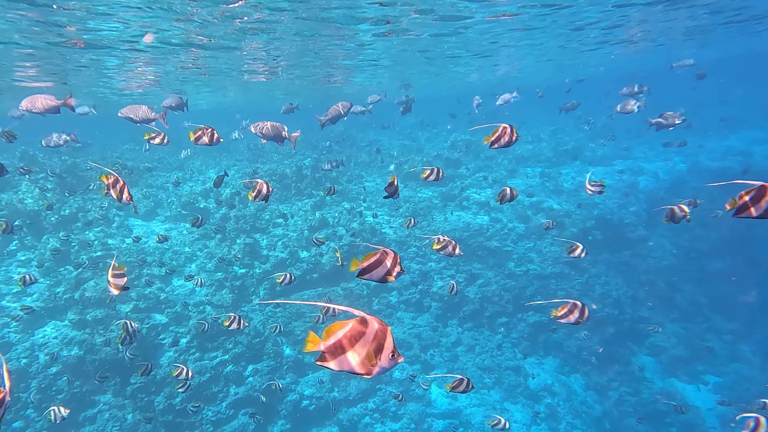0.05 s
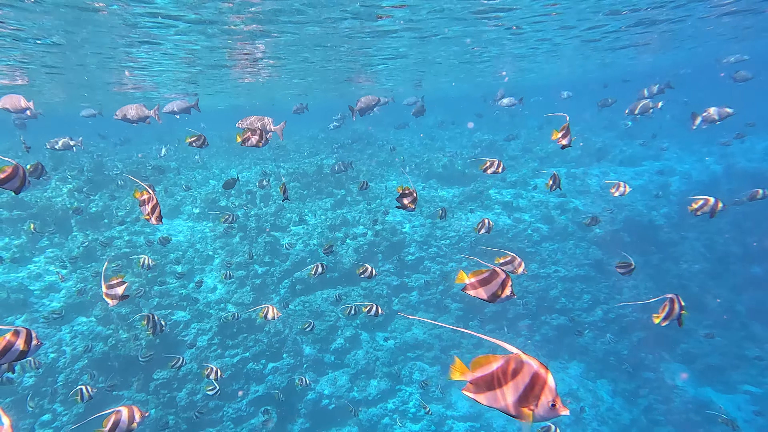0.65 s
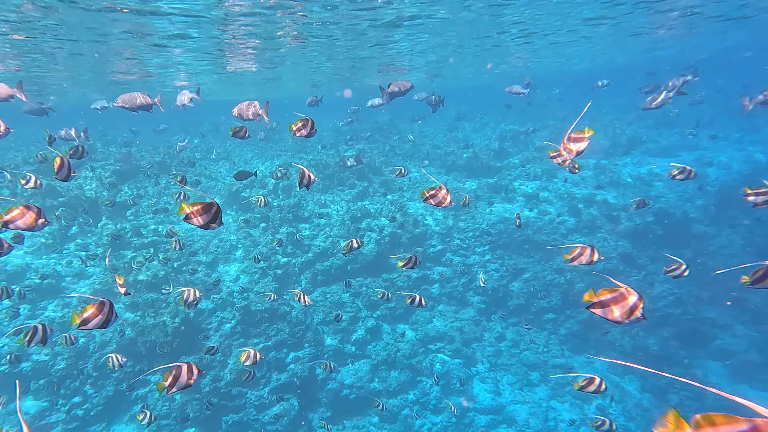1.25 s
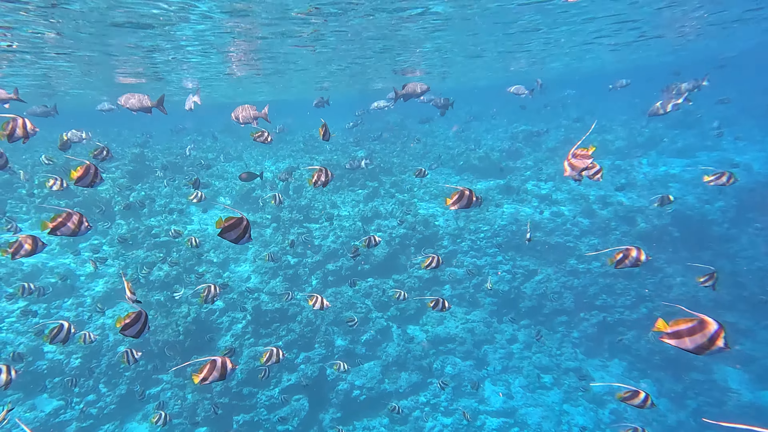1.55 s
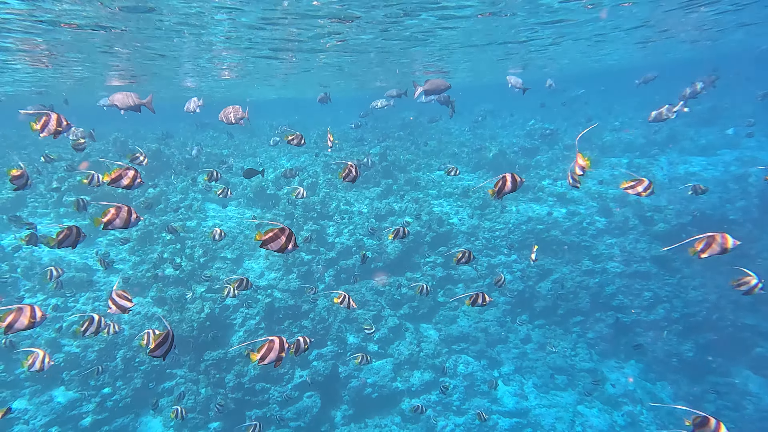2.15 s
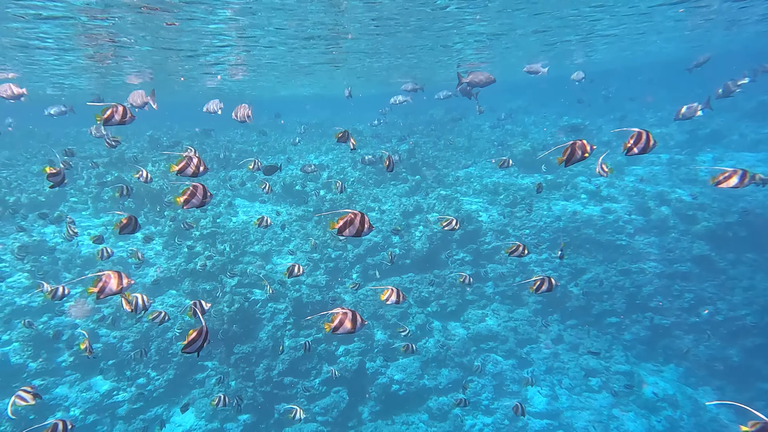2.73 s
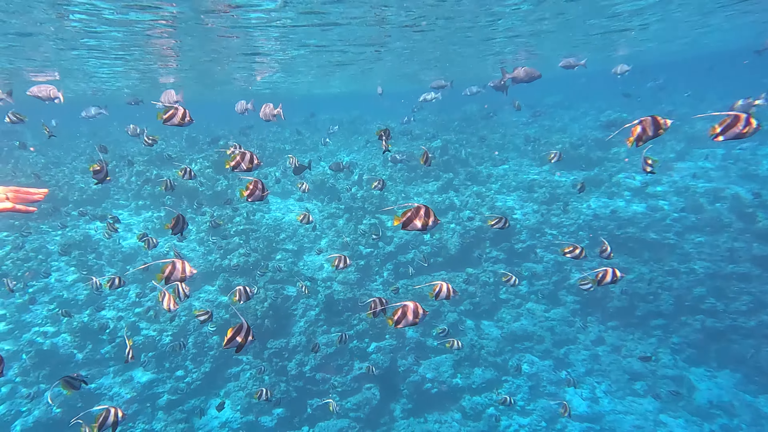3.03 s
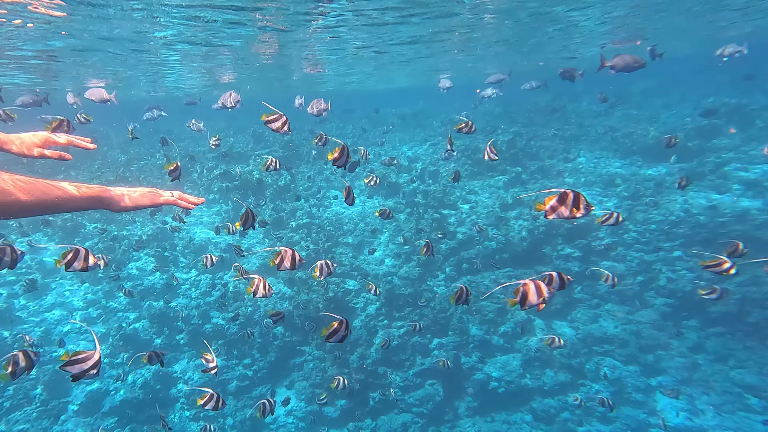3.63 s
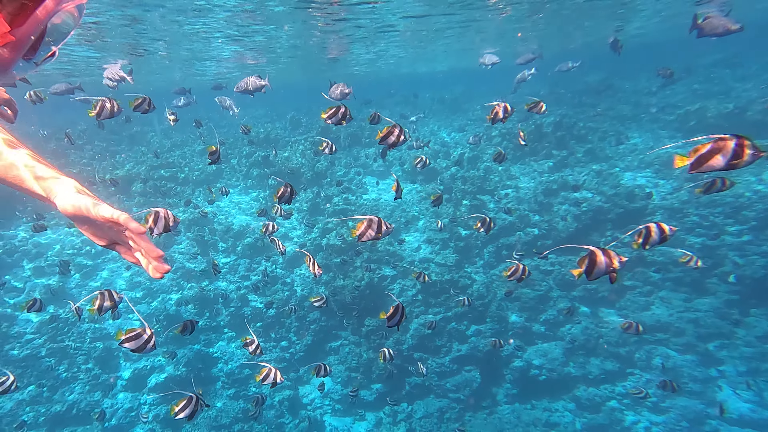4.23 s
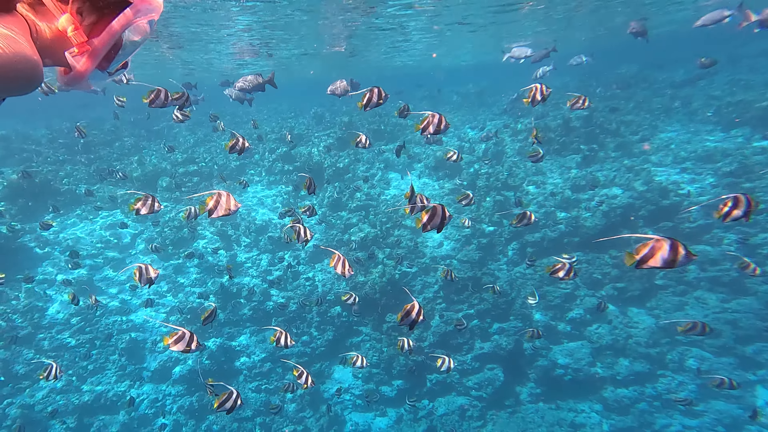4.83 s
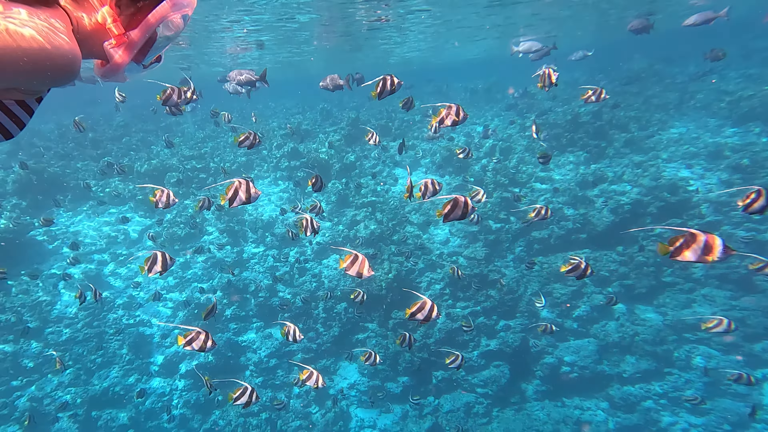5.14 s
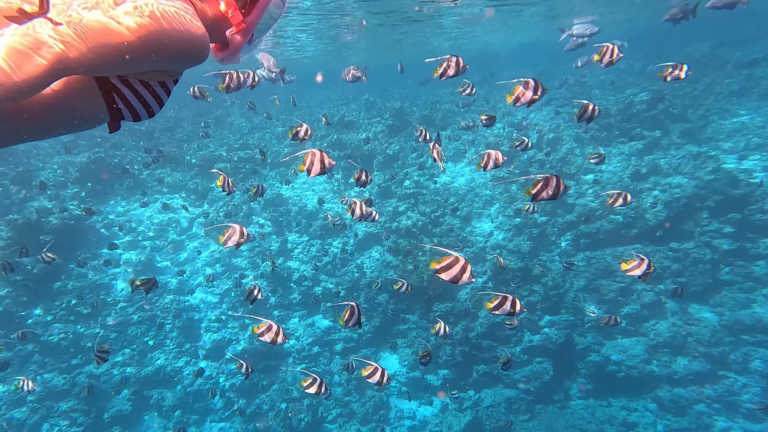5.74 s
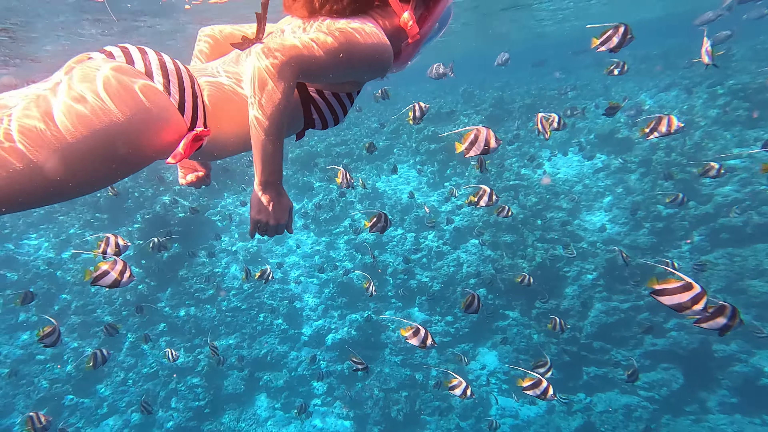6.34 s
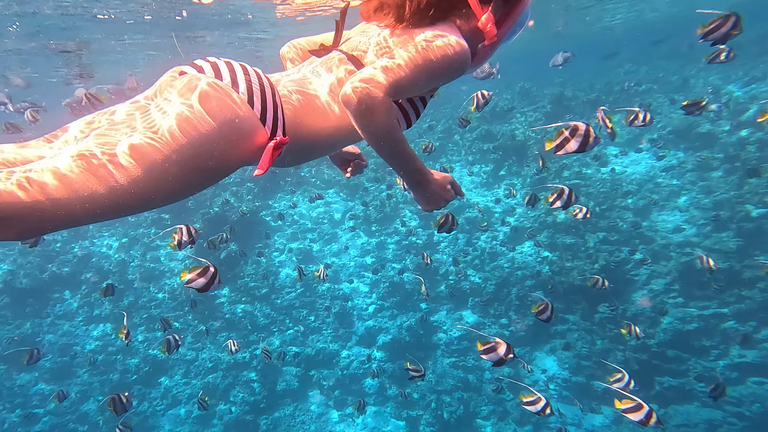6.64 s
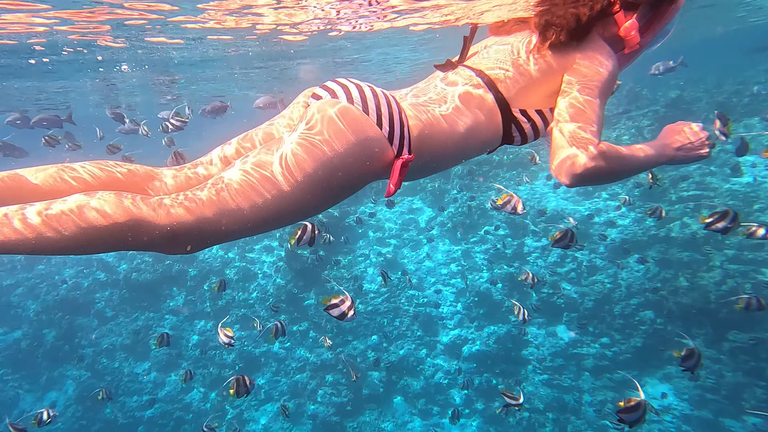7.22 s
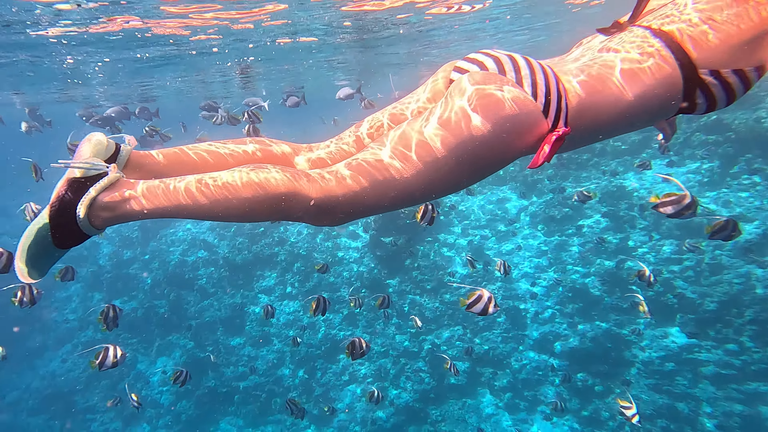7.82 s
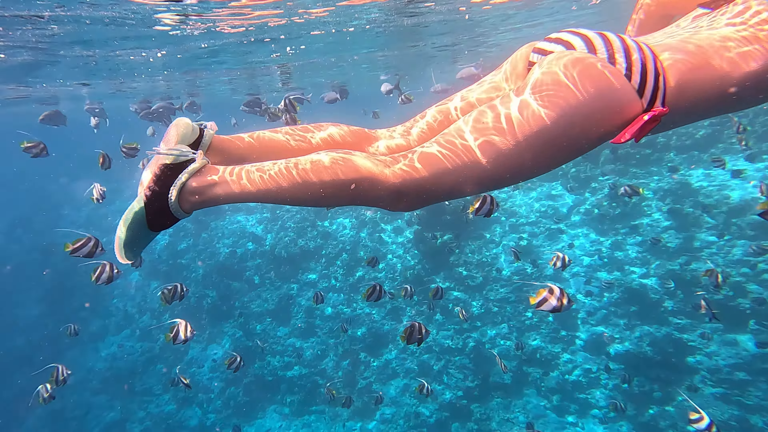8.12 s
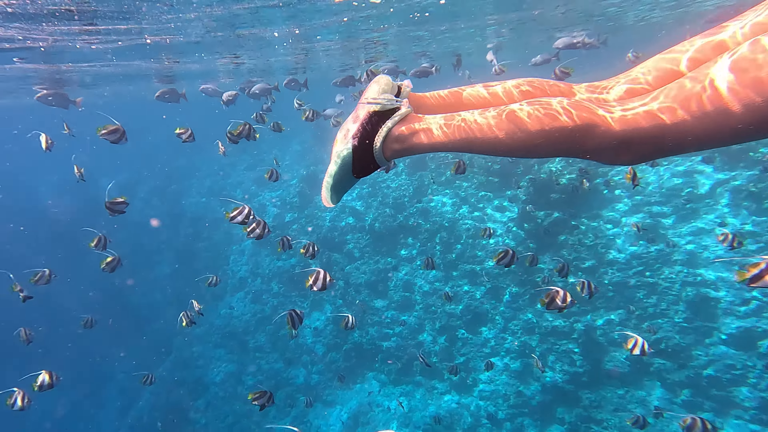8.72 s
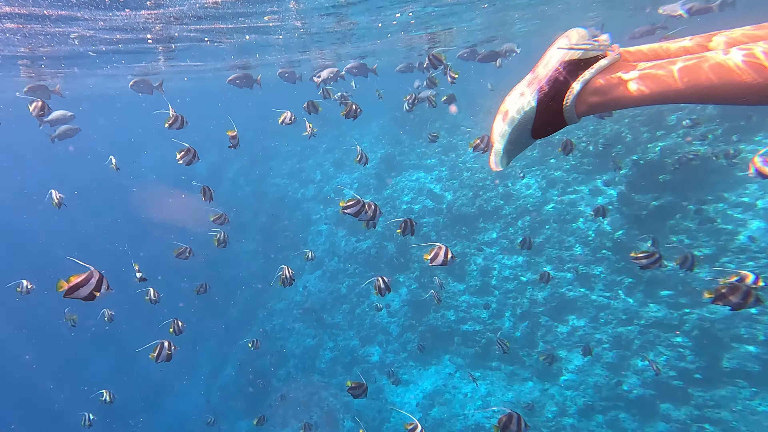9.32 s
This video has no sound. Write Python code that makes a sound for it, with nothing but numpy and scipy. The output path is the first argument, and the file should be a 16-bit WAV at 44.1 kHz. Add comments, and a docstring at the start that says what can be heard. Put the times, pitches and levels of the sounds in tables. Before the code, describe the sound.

Moving water rumbles and thuds against an underwater microphone while shrimp crackle faintly and small ripples plip overhead.

```python
"""Low water rumble and a crackle of snapping shrimp, heard just under the surface above a coral reef.
The two microphones sit in the housing of a drifting camera while a swimmer passes. Eddies and shoves of
water rock the housing, wavelets lap and plip close overhead, a few bubbles ring, and light knocks chirp
down through the mount. Shrimp snap their claws near and far, coloured by the housing's resonances."""
import sys
import numpy as np
from scipy import signal
from scipy.fft import rfft, irfft, next_fast_len
from scipy.io import wavfile
from scipy.ndimage import uniform_filter1d, map_coordinates

SR = 44100
rng = np.random.default_rng(int(sys.argv[2]) if len(sys.argv) > 2 else 0)


def generate_wav(signal):
    """Clip the signal to [-1, 1] and save it as 16-bit WAV at the path in sys.argv[1]."""
    frames = np.transpose(np.atleast_2d(signal))
    scaled = np.clip(frames, -1, 1) * 32767
    pcm = np.round(scaled).astype(np.int16)
    wavfile.write(sys.argv[1], SR, pcm)


N = 417627

# Levels are relative within each table; t60 is the time to fade by 60 dB.
# current along the housing: time_s, level_db
CURRENT = [(0.0, -37.5), (0.31, -37), (2.03, -34), (2.53, -37), (3.35, -33), (3.59, -36), (4.56, -35.5),
           (5.19, -38.5), (6.7, -30), (7.07, -33.5), (7.44, -32.5), (9.47, -32)]
# swirls brushing the housing: start_s, length_s, level_db
SWIRLS = [(0.764, 0.42, -41), (1.977, 0.16, -42), (3.052, 0.099, -39), (3.264, 0.16, -41),
          (4.256, 0.038, -43), (4.383, 0.087, -37.5), (6.136, 0.04, -38.5), (6.43, 0.17, -42),
          (7.131, 0.12, -41), (7.498, 0.13, -43), (7.686, 0.016, -59), (8.326, 0.13, -42),
          (8.537, 0.1, -45), (8.877, 0.02, -46), (8.951, 0.021, -41)]
# spectra of the large and the small eddies: frequency_hz, level_db
SURGE_SPECTRUM = [(6, -30.5), (15, -2), (24, -1), (32, 1), (42, -4), (55, -3), (70, -17.5), (100, -40),
                  (200, -47.5), (400, -120)]
FLUTTER_SPECTRUM = [(35, -32.5), (60, -3.5), (80, 0), (100, -1), (122, 1.5), (138, -13.5), (165, -27.5),
                    (250, -36), (600, -86)]
# wash of the surface, just overhead: time_s, level_db
SURFACE_WASH = [(0.0, -62), (0.58, -71), (1.21, -64.5), (1.69, -67.5), (2.08, -67.5), (2.27, -58.5),
                (3.27, -61), (3.48, -65.5), (4.61, -62.5), (4.8, -62), (5.62, -59), (6.01, -61),
                (6.28, -57.5), (7.02, -67), (7.65, -66.5), (9.47, -68)]
# larger wavelets: start_s, level_db, length_s
LAPS = [(0.13, -55.5, .06), (0.31, -54, 0.036), (0.974, -57, .12), (1.782, -55, 0.092), (2.07, -51, 0.16),
        (3.33, -59.5, 0.16), (5.016, -46.5, 0.042), (6.133, -54.5, 0.063), (6.35, -54, .08),
        (6.666, -50, 0.11), (7.194, -56, 0.049), (7.353, -48, 0.046), (7.833, -54, 0.19),
        (8.489, -49, 0.095), (8.8, -52.5, 0.039), (9.333, -56, 0.12)]
# spectrum of the wash: frequency_hz, level_db
SLOSH_SPECTRUM = [(80, -28.5), (160, -2), (290, 0.5), (420, -3.5), (560, -5.5), (750, -13), (1100, -21),
                  (2500, -41), (6000, -102)]
# the right microphone hears more wash; rows left, right: gain_db
SLOSH_BALANCE = [
    [-0.86],
    [2],
]
# sizzle of the distant reef: time_s, level_db
REEF_SIZZLE = [(0.0, -55.5), (3.45, -57.5), (4.01, -56), (5.27, -55.5), (5.64, -54.5), (7.49, -58),
               (9.36, -57), (9.47, -57.5)]
# spectra of shrimp at far, middle and close range: frequency_hz, level_db
FAR_SPECTRUM = [(150, 1), (500, -14), (900, -1), (1500, 4.5), (2400, -1.5), (3800, -1), (5000, -1.5),
                (6800, -0.5), (8000, -8.5), (10000, -11.5), (12300, -22), (14000, -24.5), (16000, -49)]
MIDDLE_SPECTRUM = [(300, -58), (1500, -5), (3000, -7), (5000, -1.5), (7000, 6.5), (8500, 6), (10000, -2.5),
                   (12300, -3.5), (16000, -27)]
CLOSE_SPECTRUM = [(200, -34), (700, -17.5), (1500, -7.5), (2600, 2.5), (4200, 6.5), (5500, 4), (6700, 4),
                  (8000, -5), (10000, -12), (12300, -23), (16000, -34)]
# closest shrimp: start_s, level_db, brightness_db_per_octave, narrowness_db_per_octave_squared
CLOSE_SNAPS = [(0.0295, -39.5, -0.5, -2), (0.0936, -49, -6, -6.5), (0.1409, -43.5, -11, -0.5),
               (0.2577, -38, -1.5, 0), (0.407, -46.5, 3, -7), (0.7655, -36, -0.5, 0), (0.865, -45, 14, 4),
               (0.8772, -50.5, 2, -8), (0.933, -47, 20, 13), (0.9454, -50.5, 2, -1), (1.0272, -48, -22, 7),
               (1.2954, -48.5, 5, 2), (1.626, -44, 6.5, 3), (1.7706, -45, -5, 18), (1.7922, -44, 1.5, -4),
               (1.8743, -42.5, 3.5, -4.5), (2.232, -50.5, -1, 13), (2.56, -39, -3, -2.5),
               (2.5883, -44.5, 0, -5), (2.652, -49.5, -14, 16), (2.9754, -47.5, 6, -2.5),
               (3.09, -50, 1, -3), (3.2243, -49.5, 10, 3), (3.511, -48, 5, -7), (3.661, -49.5, 7, 2),
               (3.689, -45.5, 1, 2), (3.943, -46.5, 4, -6.5), (3.9709, -48, 2, -5.5), (4.0024, -40, 3, 8),
               (4.0254, -48.5, 2, -5), (4.1304, -49, -8, 1.5), (4.149, -46, 0, 1), (4.1571, -41, 5.5, -3),
               (4.2698, -38, -2.5, -0.5), (4.333, -42.5, -0.5, 1), (4.485, -49, 4, 4),
               (4.5128, -49.5, -1, -6), (4.523, -47.5, 6, -6), (4.574, -43.5, 5, -1.5),
               (5.1049, -43, -4, 6), (5.18, -46, 8, 3), (5.211, -45, 11, 7), (5.2555, -42, 0, 2),
               (5.3307, -44.5, -0.5, -4.5), (5.4909, -47, -2, -7), (5.5045, -44.5, 0.5, -5),
               (5.6485, -41.5, -1, -5.5), (6.0304, -49, 11, -1), (6.0472, -50, 2.5, -6),
               (6.2365, -43.5, -4, 39), (6.4186, -51.5, 17, 5), (6.4722, -50.5, 6, -2),
               (6.668, -47.5, 1.5, -4), (6.868, -53, 2, 2), (7.2603, -50, 11, 12), (7.48, -49, 7.5, -4),
               (7.7013, -48, 13, -5), (7.8691, -48.5, 4, -6), (7.9267, -41, -5, -1.5),
               (8.0201, -47.5, 4, -1), (8.2107, -45, 4, 4), (8.3724, -43.5, 4.5, -5.5),
               (8.5, -45.5, -18, 7.5), (8.6866, -51.5, 3, -2), (8.7898, -38.5, -2, -2.5),
               (8.966, -46.5, 1, -2), (8.978, -46.5, 6, 3), (9.1113, -38, 2, 0), (9.4347, -40.5, -2.5, 0)]
# single bubbles: start_s, level_db, pitch_hz, t60_s
BUBBLES = [(0.112, -48, 546, 0.19), (1.79, -40, 559, 0.051), (3.195, -41, 557, 0.12),
           (4.275, -49.5, 541, 0.13), (5.73, -48, 536, 0.062), (6.16, -42, 547, 0.065)]
# splashes overhead: start_s, level_db, pitch_hz, t60_s
SPLASHES = [(0.228, -42, 1480, .04), (0.789, -51, 1650, 0.08), (1.069, -48, 1450, 0.069),
            (1.168, -44.5, 1590, 0.045), (1.198, -39.5, 1340, 0.029), (2.09, -47.5, 2820, 0.22),
            (2.316, -43.5, 1530, 0.074), (3.449, -47, 1610, .04), (3.943, -37.5, 1530, 0.04),
            (4.466, -49, 1410, 0.029), (4.803, -45, 1550, 0.033), (5.466, -44, 1000, .05),
            (5.559, -36.5, 1530, 0.019), (5.733, -43.5, 1460, 0.059), (6.163, -43.5, 905, .06),
            (6.36, -48.5, 855, 0.2), (6.728, -47, 1200, 0.034), (6.764, -49, 1200, 0.034),
            (7.296, -47, 1590, 0.024), (7.347, -51, 750, 0.036), (7.553, -46.5, 2550, 0.066),
            (8.485, -49, 507, 0.17), (8.51, -48, 2620, .12), (9.144, -46, 1460, 0.037),
            (9.324, -51, 640, 0.029)]
# shoves of water on the housing: start_s, sway_db, shudder_db
SHOVES = [(0.268, -22, -50), (0.785, -25, -24), (1.17, -22, -35), (1.749, -22.5, -49), (2.057, -22.5, -31),
          (2.749, -22, -40), (3.112, -20.5, -28), (4.246, -21, -29.5), (4.395, -24.5, -25.5),
          (4.597, -22.5, -41), (6.537, -18.5, -23.5), (7.01, -27, -45), (7.117, -25, -34),
          (7.18, -30, -28.5), (7.541, -18.5, -33), (7.98, -18.5, -49), (8.608, -29, -28)]
# the housing's slow modes, sway then shudder: pitch_hz, rise_s, t60_s
ROCKING_MODES = [(32.6, 0.031, .14), (112.5, 0.01, 0.068)]
# knocks on the mount: start_s, level_db, body_hz, tick_db, travel_s (at 1 kHz)
KNOCKS = [(0.786, -50.5, 260, -20, 0.00301), (0.98, -52, 400, -22, 0.00293), (2.098, -48, 380, -18, 0.0055),
          (3.34, -46, 326, -16, .003), (5.313, -46.5, 330, -23, 0.0053), (5.462, -49, 454, -12, .004),
          (5.556, -43.5, 555, -5, .003), (5.878, -46, 354, -15, .004), (6.134, -38.5, 330, -32, .003),
          (6.340, -44, 490, -5, .004), (7.174, -45.5, 290, -1, 0.0077), (7.346, -37, 676, 2, 0.00294),
          (7.826, -49, 347, 3, 0.0074), (8.555, -46.5, 272, -29, 0.0052), (8.791, -45, 506, -1, 0.0088),
          (9.322, -39.5, 580, 5, 0.0027)]
# resonances of the housing: centre_hz, width_hz, left_db, right_db
HOUSING_RESONANCES = [(552.4, 67, 11.5, 5.5), (827, 108, -6, -8), (1235, 225, -16.5, 13),
                      (1336, 143, 10.5, -24.5), (1570, 477, 8.5, 8), (1811, 177, 8, 2.5),
                      (2250, 930, -6.5, -5.5), (2498, 280, 15, 9.5), (2976, 185, 6, 13),
                      (3100, 134, 2.5, -23.5), (5140, 320, 5.5, 6), (7210, 220, 4.5, 2)]
# likeness of the two microphones: frequency_hz, coherence
MIC_COHERENCE = [(60, 1), (140, .99), (260, 0.8), (600, 0.77), (1200, 0.74), (2300, 0.99), (3300, 0.19),
                 (5000, 0.86), (9000, 0.96), (13000, 0.53)]


def amp(db):
    """Decibels to gain."""
    return 10 ** (np.asarray(db) / 20)


def unit(x):
    """Scale to rms 1."""
    return x / np.sqrt(np.mean(x ** 2) + 1e-20)


def along(points, hz):
    """Read (frequency_hz, value) points on a log axis."""
    frequencies, values = np.transpose(points)
    return np.interp(np.log(hz + 1), np.log(frequencies + 1), values)


def curve(points):
    """Read (time_s, value) points at every sample."""
    return np.interp(np.arange(N) / SR, *np.transpose(points))


def wobble(rate):
    """A smooth random curve with rate knots a second."""
    return map_coordinates(rng.standard_normal(int(N * rate / SR) + 4), [np.arange(N) * rate / SR])


def add(track, start_s, sound):
    """Mix a sound into a track."""
    start = int(np.clip(round(start_s * SR), 0, N - 1))
    track[..., start:start + sound.shape[-1]] += sound[..., :N - start]


def coloured(x, colour_db):
    """Causal filter whose gain in dB is a function of frequency."""
    n = x.shape[-1]
    m = 2 * next_fast_len(n // 2 + n // 20 + 1)
    cepstrum = irfft(np.log(amp(colour_db(np.fft.rfftfreq(m, 1 / SR))) + 1e-6))
    cepstrum[..., 1:m // 2] *= 2
    cepstrum[..., m // 2 + 1:] = 0
    return irfft(rfft(x, m) * np.exp(rfft(cepstrum)), m)[..., :n]


def housing_db(hz):
    """Gain of the housing's resonances at the left and right microphone."""
    return sum(np.array([[left], [right]]) / (1 + (2 * (hz - centre) / width) ** 2)
               for centre, width, left, right in HOUSING_RESONANCES)


def stereo(pair):
    """Blend two unrelated signals into partly alike left and right channels."""
    n = pair.shape[-1]
    m = next_fast_len(n)
    coherence = np.clip(along(MIC_COHERENCE, np.fft.rfftfreq(m, 1 / SR)), -1, .998)
    turn = np.arccos(coherence) / 2
    mid, side = irfft(rfft(pair, m) * [np.cos(turn), np.sin(turn)], m)
    return np.array([mid + side, mid - side])[:, :n]


def crackle(per_s, spread_db, t60_s, top_db):
    """Stereo stream of tiny bursts at rms 1: many weak, few strong."""
    when, size = rng.random((int(per_s * N / SR), 2)).T
    size_db = np.minimum(-spread_db * np.log(1 - size), top_db)
    power = np.bincount((when * N).astype(int), amp(size_db) ** 2, N)
    fading = signal.lfilter([1], [1, -np.exp(-2 * np.log(1000) / (t60_s * SR))], power)
    return unit(stereo(np.sqrt(fading) * rng.standard_normal((2, N))))


def strays(per_s, mean_db, spread_db):
    """Loosely spaced events: start_s, level_db and a normal draw to vary the tone."""
    count = int(per_s * N / SR)
    jitter, size, tone = rng.standard_normal((count, 3)).T
    starts = ((np.arange(count) + .5 * jitter) / per_s) % (N / SR)
    return zip(starts, mean_db + spread_db * size, tone)


def eddies(spectrum, evenness, eddy_s=.06):
    """Low-pitched pressure noise at rms 1, its own swells partly evened out."""
    pressure = unit(coloured(stereo(rng.standard_normal((2, N))), lambda hz: along(spectrum, hz)))
    window = int(eddy_s * SR)
    power = np.abs(uniform_filter1d(uniform_filter1d(pressure[0] ** 2, window), window)) + 1e-6
    return unit(pressure / power ** (evenness / 2))


def flow(attack_s=.012, release_s=.018):
    """Right on the housing, large eddies surge and small ones flutter, growing with current and swirls."""
    current_db, t = curve(CURRENT), np.arange(N) / SR
    swirl = np.zeros(N)
    for start, length, db in SWIRLS:
        corners_s = [start - attack_s, start, start + length, start + length + release_s]
        swirl += amp(db) * np.interp(t, corners_s, [.0038, 1, 1, .038])
    surge_gain = np.hypot(amp(current_db + 2.15 * wobble(9)), amp(2) * swirl)
    flutter_gain = np.hypot(amp(current_db - 16 + 2.5 * wobble(7)), amp(-2.5) * swirl)
    surge = surge_gain * eddies(SURGE_SPECTRUM, evenness=.85)
    flutter = flutter_gain * eddies(FLUTTER_SPECTRUM, evenness=.7)
    return surge + flutter


def slosh(rise_s=.0061):
    """Wavelets lap just overhead: a soft wash with gurgling pops, swelling at each larger wavelet."""
    t = np.arange(N) / SR
    power = amp(curve(SURFACE_WASH) + 1 + 2 * wobble(14)) ** 2
    for start, db, length in LAPS:
        power += (amp(db - 1) * np.interp(t, [start - rise_s, start, start + length], [0, 1, 0])) ** 2
    pops = crackle(per_s=130, spread_db=4.5, t60_s=.02, top_db=11)
    wash = stereo(rng.standard_normal((2, N))) + pops
    heard = unit(coloured(wash, lambda hz: along(SLOSH_SPECTRUM, hz) + housing_db(hz)))
    return np.sqrt(power) * amp(SLOSH_BALANCE) * heard


def far_shrimp():
    """Countless snaps far across the reef merge into a sizzle; mid-distance ones prick through it."""
    level_db = curve(REEF_SIZZLE)
    distant = crackle(per_s=2400, spread_db=3.5, t60_s=.008, top_db=14)
    sizzle = coloured(distant, lambda hz: along(FAR_SPECTRUM, hz) + housing_db(hz))
    out = amp(level_db - .52) * unit(sizzle)
    for centre_hz, db in [(3800, -19), (6200, -15), (9000, -13)]:
        nearer = crackle(per_s=22, spread_db=6, t60_s=.007, top_db=11)
        band_db = lambda hz: -np.minimum(8 * np.log2((hz + 1) / centre_hz) ** 2, 15)
        pricks = coloured(nearer, lambda hz: along(MIDDLE_SPECTRUM, hz) + housing_db(hz) + band_db(hz))
        out += amp(level_db + db) * unit(pricks)
    return out


def near_shrimp(burst_s=.0022, rise_s=.0012, tail_t60_s=.027, echo_db=-14, coral_t60_s=.18):
    """Each close claw snap rattles the housing, echoes off the surface and scatters in the coral."""
    out, size = np.zeros((2, N)), 3072
    t = np.arange(size) / SR
    tail = amp(-11 - 60 * t / tail_t60_s)
    direct = (np.exp(-(t / burst_s) ** 4) + tail) * (1 - np.exp(-(t / rise_s) ** 2))
    scatter = amp(-26 - 60 * t / coral_t60_s)
    farther_snaps = [(start, db, 5.5 + 3.6 * tone, 0)
                     for start, db, tone in strays(per_s=8, mean_db=-52, spread_db=1)]
    octaves = lambda hz: np.log2(np.clip(hz, 1500, 9500) / 4500)
    for start, db, brightness, narrowness in CLOSE_SNAPS + farther_snaps:
        delay = int(rng.uniform(.0018, .0129) * SR)
        echo = amp(echo_db) * np.pad(direct, (delay, 0))[:size]
        burst = stereo(rng.standard_normal((2, size)) * np.sqrt(direct ** 2 + echo ** 2 + scatter ** 2))
        claw_db = lambda hz: brightness * octaves(hz) - narrowness * octaves(hz) ** 2
        snap = coloured(burst, lambda hz: along(CLOSE_SPECTRUM, hz) + housing_db(hz) + claw_db(hz))
        level = np.sqrt(np.mean(snap ** 2) * size / (.003 * SR))  # rms if all its energy fell in 3 ms
        add(out, start - .0007, amp(db + 6.5) * snap / level)
    return out


def bubbles(climb_per_s=.58, waver_rad=.67):
    """Slightly to the left, each bubble swells, rings unsteadily and climbs a little in pitch."""
    out, t = np.zeros(N), np.arange(SR // 4) / SR
    knots = np.linspace(0, t[-1], 40)
    for start, db, hz, t60 in BUBBLES:
        waver = waver_rad * np.interp(t, knots, rng.standard_normal(len(knots)))
        phase = 2 * np.pi * hz * t * (1 + climb_per_s * t / 2) + waver
        ring = np.sin(phase) * amp(-60 * t / t60) * (1 - np.exp(-10 * t / t60)) ** 2
        add(out, start, amp(db - 4.5) * ring / np.abs(ring).max())
    return out * amp([[1], [-1]])


def splashes():
    """Ripples break overhead into rough little plips and swishes: a few clear ones over a faint patter."""
    def band_db(centre_hz):
        return lambda hz: housing_db(hz) - np.minimum(12 * np.log2((hz + 1) / centre_hz) ** 2, 50)

    patter = crackle(per_s=70, spread_db=3, t60_s=.018, top_db=8)
    out = amp(-67) * unit(coloured(patter, band_db(1480)))
    t = np.arange(SR // 4) / SR
    small_plips = [(start, db, 900 * 2 ** (.46 * tone), .042)
                   for start, db, tone in strays(per_s=4, mean_db=-50, spread_db=1.5)]
    for start, db, hz, t60 in SPLASHES + small_plips:
        envelope = amp(-60 * t / t60) * (1 - np.exp(-20 * t / t60))  # longer ones swell more slowly
        plip = coloured(stereo(rng.standard_normal((2, len(t))) * envelope), band_db(hz))
        add(out, start - .001, amp(db + 3.6) * plip / np.abs(plip).max())
    return out


def thumps():
    """Each shove of water makes the housing shudder quickly, then sway slowly, alike at both microphones."""
    out, t = np.zeros(N), np.arange(SR // 3) / SR
    for start, *levels_db in SHOVES:
        for db, (hz, rise, t60) in zip(levels_db, ROCKING_MODES):
            envelope = amp(-60 * t / t60) * (1 - np.exp(-(t / rise) ** 2))
            ring = np.sin(2 * np.pi * hz * rng.uniform(.92, 1.08) * t) * envelope
            add(out, start, amp(db - 2.5) * ring / np.abs(ring).max())
    # soft water pressure carries no treble
    return signal.sosfiltfilt(signal.butter(6, 170, fs=SR, output="sos"), out)


def knocks(rattle_t60_s=.11, mount_hz=295, mount_t60_s=.077):
    """Bending waves in the mount carry treble faster than bass: a knock chirps down into a low ring."""
    out, size = np.zeros((2, N)), 4096
    hz, t = np.fft.rfftfreq(size, 1 / SR), np.arange(size) / SR
    ring = np.sin(2 * np.pi * mount_hz * t) * amp(-60 * t / mount_t60_s) * (1 - np.exp(-t * mount_hz))
    for start, db, body_hz, tick_db, travel_s in KNOCKS:
        # travel time falls with the square root of frequency
        chirp = irfft(np.exp(-4j * np.pi * travel_s * np.sqrt(hz * 1000)))
        rattle = .49 * unit(rng.standard_normal((2, size)) * amp(-60 * t / rattle_t60_s))
        body = [(body_hz / 4, -24), (body_hz * .67, -6), (body_hz, 4),
                (body_hz * 1.77, -4), (body_hz * 2, -8)]
        tick = [(1600, tick_db - 14), (3200, tick_db - 6.5), (4500, tick_db - 25), (12000, -42)]
        knock = coloured(unit(chirp) + rattle, lambda f: along(body + tick, f) + housing_db(f) / 2)
        body_only = coloured(knock, lambda f: along([(1000, 0), (1600, -40)], f))
        add(out, start - travel_s * .4, amp(db + 3) * knock / np.abs(body_only).max())
        add(out, start + travel_s * 1.78, amp(db - 6) * ring / np.abs(ring).max())
    return out


def scene():
    """Water, mount and reef as they reach the two microphones."""
    water = flow() + thumps() + slosh() + bubbles() + splashes()
    return water + knocks() + far_shrimp() + near_shrimp()


def record(dry):
    """The camera keeps nothing above its band limit."""
    top_hz, size = 15900, next_fast_len(N + SR // 2)
    passband = np.fft.rfftfreq(size, 1 / SR) < top_hz
    return irfft(rfft(dry, size) * passband, size)[:, :N]


dry = scene()
out = record(dry)
generate_wav(out)
```